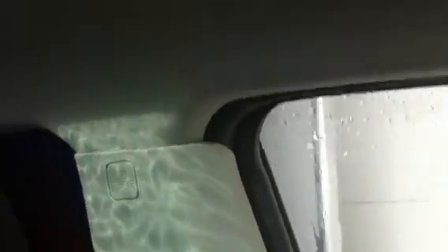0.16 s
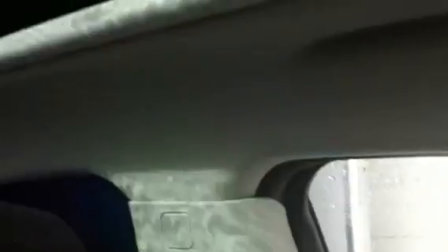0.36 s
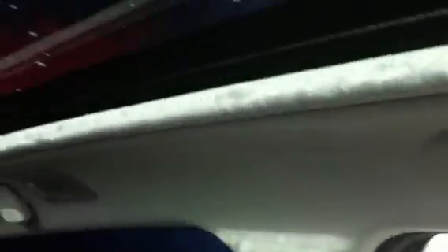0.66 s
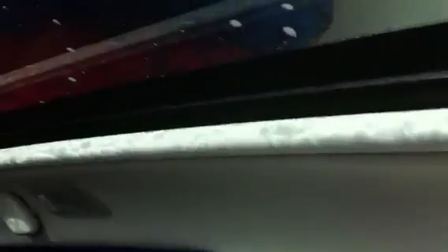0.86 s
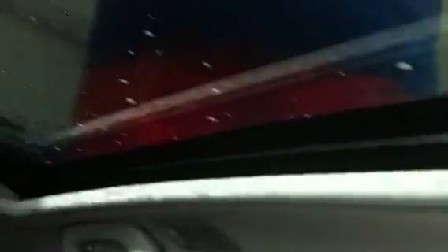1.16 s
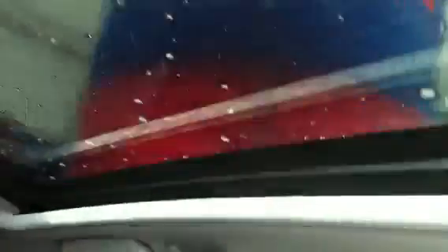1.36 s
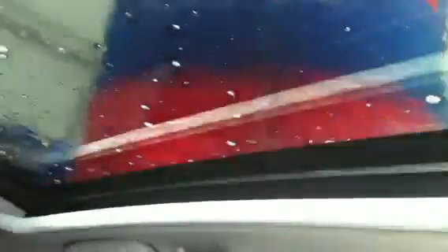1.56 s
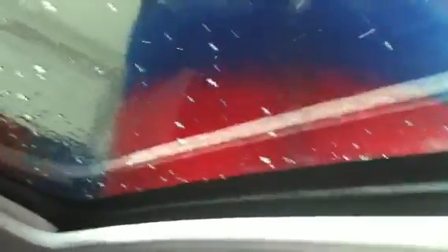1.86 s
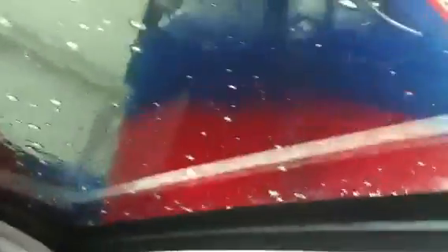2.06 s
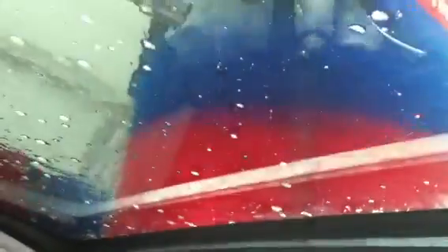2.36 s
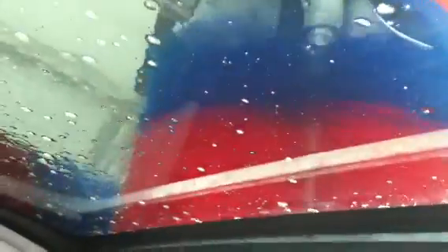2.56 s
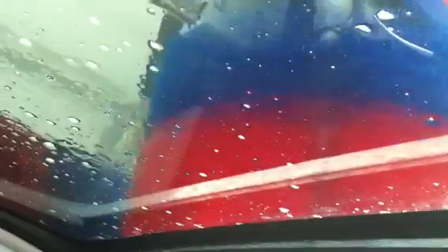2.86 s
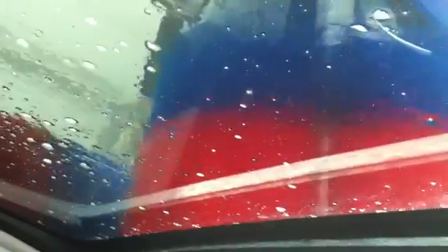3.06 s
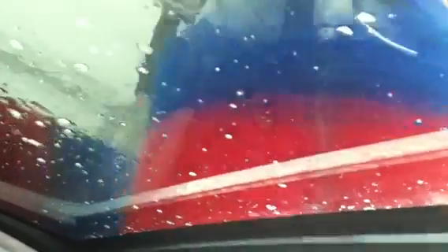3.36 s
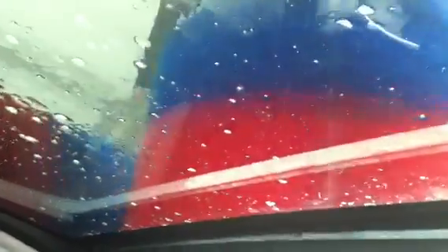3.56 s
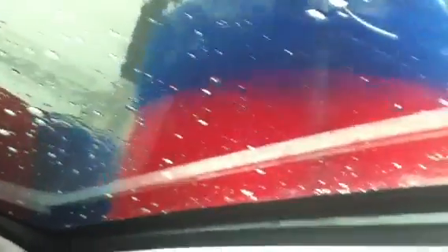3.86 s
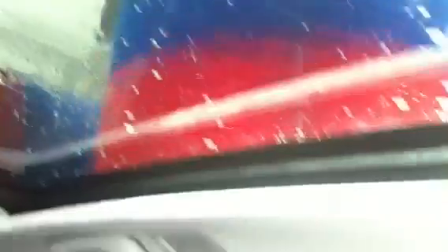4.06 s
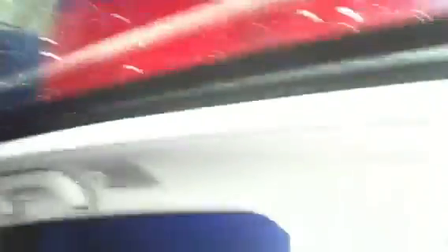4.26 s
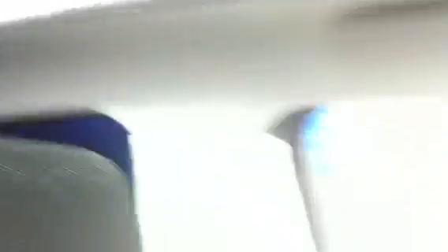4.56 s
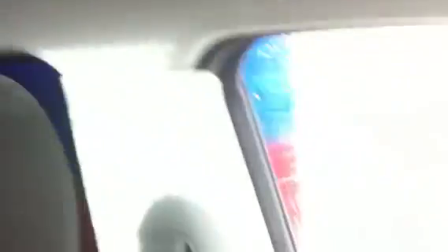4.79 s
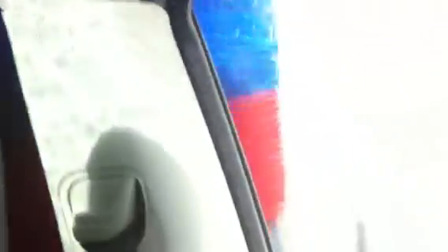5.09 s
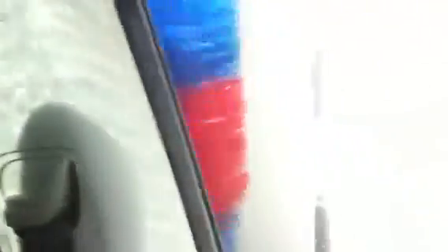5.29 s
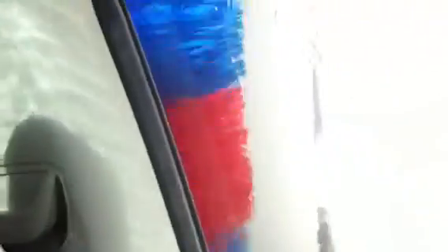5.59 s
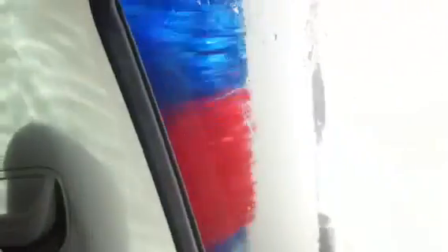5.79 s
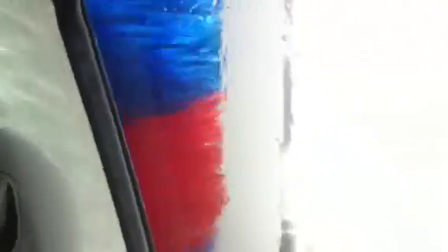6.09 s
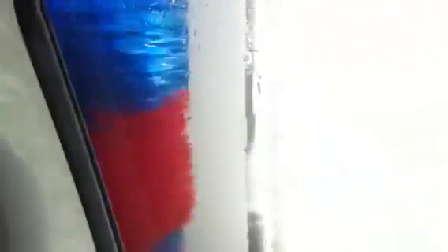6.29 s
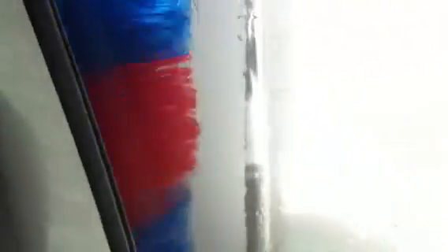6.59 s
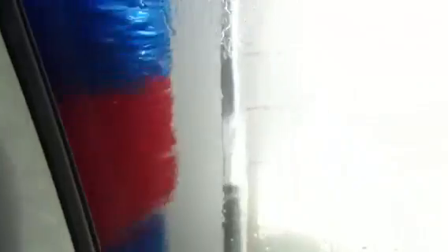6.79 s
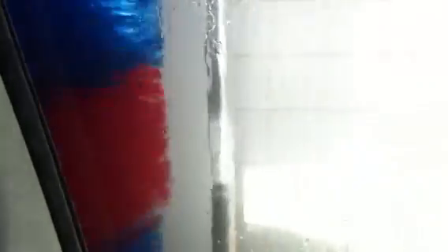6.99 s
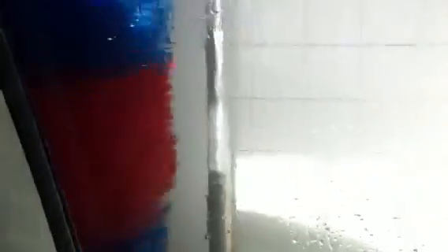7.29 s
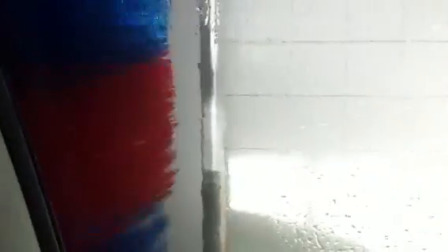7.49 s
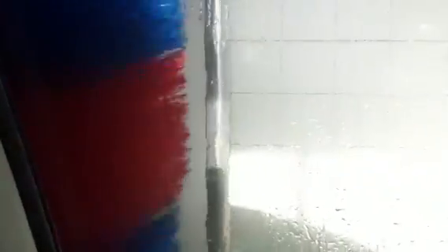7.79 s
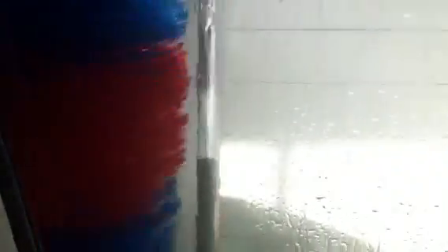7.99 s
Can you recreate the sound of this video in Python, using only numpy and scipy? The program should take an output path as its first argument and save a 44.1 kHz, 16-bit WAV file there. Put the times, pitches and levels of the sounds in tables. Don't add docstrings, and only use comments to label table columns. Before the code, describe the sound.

Close cabin sound: smooth water hiss, pattering on glass and low rumble. Scraping, stuttering skin noise covers the microphone, leaving a quiet muffled drone with a small tick. Then a hard thump, rub and popping release bring the wash back, crisp and misty. Brush strips slap the door skin and windows, pausing briefly, then drumming harder with bursts of splash before easing at the end.

```python
import sys
import numpy as np
from scipy import signal
from scipy.io import wavfile

SR = 44100
rng = np.random.default_rng(int(sys.argv[2]) if len(sys.argv) > 2 else 0)


def wav_out(sig):
    wavfile.write(sys.argv[1], SR, np.round(np.clip(np.atleast_2d(sig).T, -1, 1) * 32767).astype(np.int16))


def field_ratio(decibels):
    return 10 ** (np.asarray(decibels, dtype=float) / 20)


N = 358974
TURN_S = 3
MEAN_FLOW_DB = -41


def rms_one(x):
    return x / np.sqrt(np.mean(x ** 2) + 1e-20)


def in_time(rows):
    s, *columns = np.transpose(rows)
    return [np.interp(np.arange(N) / SR, s, c) for c in columns]


def fading(t, start_s, decay_s):
    return np.exp(-np.maximum(t - start_s, 0) / decay_s)


def drift(rate):
    r = np.exp(-80 * np.pi * rate / SR)
    slow = signal.lfilter([1], [1, -2 * r, r * r], rng.standard_normal(N // 40 + 2002))[2000:]
    return np.interp(np.arange(N) / 40, np.arange(len(slow)), rms_one(slow))


def butter(x, hz, kind, order=2):
    return signal.sosfilt(signal.butter(order, hz, kind, fs=SR, output="sos"), x)


def resonate(x, hz, width_hz):
    r = np.exp(-np.pi * width_hz / SR)
    zeros = np.array([1, 0, -1]) * (1 - r * r) / 2
    poles = [1, -2 * r * np.cos(2 * np.pi * hz / SR), r * r]
    return signal.lfilter(zeros, poles, x + 1e-18)


def grains(per_s, spread_db):
    sizes = field_ratio(spread_db * np.minimum(rng.exponential(1, N), 4)) * rng.choice([-1, 1], N)
    return sizes * (rng.random(N) < per_s / SR)


def coloured(spectrum, patchy_db, shared_db):
    hz, db = np.transpose(spectrum)
    edges = 2 ** np.arange(np.log2(hz[0]), np.log2(hz[-1]) + 1 / 6, 1 / 3)
    together = shared_db * drift(7.1)
    white = rng.standard_normal((2, N))
    out = 0
    for k, (low, high) in enumerate(zip(edges, np.minimum(edges[1:], .45 * SR))):
        level_db = np.interp(np.log(low * high) / 2, np.log(hz), db)
        flicker = field_ratio(level_db + together + patchy_db * drift(18.0))
        out = out + flicker * butter(white[k % 2], [low, high], "band")
    return rms_one(out)


# pitch_hz, width_hz, level_db
DOOR_MODES = [(235.8, 38.6, -3.5), (283.1, 37.6, -2.5), (351.2, 31, -8)]


def door_skin(blows):
    out = 0
    for k, (hz, width_hz, db) in enumerate(DOOR_MODES):
        once = resonate(blows, hz, width_hz)
        out = out + field_ratio(db) * resonate(once, hz, 2.0 * width_hz) * (-1) ** k
    return out


# time_s, drumming_db
BRUSH_LOAD = [(0, -40), (.3, -38), (.72, -29), (4.42, -38.5), (5.0, -33.5), (5.5, -26), (5.8, -24.5),
              (5.95, -30.5), (6.4, -39.5), (6.7, -23), (6.96, -26), (7.25, -19.5), (7.42, -25.5),
              (7.62, -17.5), (7.85, -22), (8.14, -31.5)]
# time_s, hiss_db
WATER_FLOW = [(0, -42.5), (.46, -41), (.524, -37.5), (.57, -43), (.7, -38), (4.42, -43.5), (4.84, -38.5),
              (5.0, -40), (5.6, -37.5), (5.82, -39), (5.96, -44), (6.5, -44.5), (6.7, -42), (6.99, -43.5),
              (7.16, -35.5), (7.36, -40), (7.66, -35), (8.14, -41.5)]
# start_s, peak_db
STRIP_THUDS = [(5.038, -20), (5.32, -23), (5.563, -16), (5.619, -19.5), (5.719, -16), (5.753, -12.5),
               (5.842, -19.5), (5.899, -16), (6.486, -31), (6.65, -14), (6.689, -18), (6.721, -20),
               (6.82, -17), (7.069, -23), (7.117, -13), (7.206, -15), (7.25, -11), (7.304, -12.5),
               (7.457, -10.5), (7.549, -10), (7.598, -14), (7.636, -10), (7.699, -7.5), (7.787, -12),
               (7.817, -22), (7.848, -17.5), (7.906, -11.5), (8.006, -25), (8.063, -22)]
# pitch_hz, width_hz, level_db
GLASS_MODES = [(600, 63, -1.5), (894, 35, 0), (1034, 36, -0.5), (1962, 70, -8)]
# pitch_hz, level_db_per_hz
RUMBLE_SPECTRUM = [(30, -28.5), (50, -38), (68, -25.5), (124, 3.5), (190, 2.5), (300, -1.5), (450, -5.5),
                   (700, -57)]
# pitch_hz, level_db_per_hz
PATTER_SPECTRUM = [(250, -8.5), (420, -1), (540, -5), (900, -7.5), (1200, -11), (1600, -19), (2500, -23)]


def brushes():
    mean_load_db = -30
    rumble_mean_db, rumble_share = -38.5, 0.18
    patter_mean_db, patter_share = -38, .6
    surge_db, surges_per_s = 1.35, 5.4
    roof_rumble_db, roof_patter_db = 3, 2.5
    (load_db,), (flow_db,) = in_time(BRUSH_LOAD), in_time(WATER_FLOW)
    roof = np.arange(N) < TURN_S * SR
    rumble_db = rumble_mean_db + rumble_share * (load_db - mean_load_db) + roof_rumble_db * roof
    patter_db = patter_mean_db + patter_share * (flow_db - MEAN_FLOW_DB) + roof_patter_db * roof
    panel_db = load_db + surge_db * drift(surges_per_s)

    slaps = butter(grains(900.0 * field_ratio(4.0 * drift(22.0)), spread_db=3.0), 1740, "low")
    panel = rms_one(door_skin(slaps))
    glass = 0
    for k, (hz, width_hz, db) in enumerate(GLASS_MODES):
        glass = glass + field_ratio(db) * resonate(slaps, hz, width_hz) * (-1) ** k
    patter = coloured(PATTER_SPECTRUM, patchy_db=0.5, shared_db=1.1)
    patter = patter + field_ratio(panel_db + 21.0) * rms_one(glass)
    heavy = np.zeros(N)
    for s, db in STRIP_THUDS:
        heavy[round(s * SR)] = field_ratio(db + 40.5)
    rumble = coloured(RUMBLE_SPECTRUM, patchy_db=1.0, shared_db=0.77)
    return (field_ratio(rumble_db + 4.5) * rumble + door_skin(heavy)
            + field_ratio(panel_db - 4.5) * panel + field_ratio(patter_db - 1.3) * patter)


# pitch_hz, level_db_per_hz
HISS_SPECTRUM = [(900, -6), (1500, 1), (2200, 0), (3900, 0.5), (5200, -3.5), (7000, -11.5), (9000, -10.5)]
# pitch_hz, level_db_per_hz
MIST_SPECTRUM = [(4000, -11), (6000, 1), (9000, 0.5), (10500, -4), (14400, -6.5), (16000, -13)]


def spray():
    splash_db_at_full, splash_s = 2.5, 0.013
    mist_mean_db, mist_share, roof_mist_db = -48, 0.79, -3.5
    shadow_share, shadow_lead_s = 1.2, .025
    cloud_start_db, cloud_from_s, cloud_thins_s = 3, 3.9, .8
    t = np.arange(N) / SR
    splash_db = 0
    for s, db in STRIP_THUDS:
        splash_db = splash_db + splash_db_at_full * field_ratio(db + 11) * (t >= s) * fading(t, s, splash_s)
    hiss_db = in_time(WATER_FLOW)[0] + splash_db
    shadow_db = shadow_share * np.roll(opening_db(), -int(shadow_lead_s * SR))
    cloud_db = cloud_start_db * fading(t, cloud_from_s, cloud_thins_s)
    mist_db = mist_mean_db + mist_share * (hiss_db - MEAN_FLOW_DB)
    mist_db = mist_db + np.where(t < TURN_S, roof_mist_db + shadow_db, cloud_db)

    drops = rms_one(butter(grains(1500.0, spread_db=5.5), [2500, 11000], "band"))
    hiss = coloured(HISS_SPECTRUM, patchy_db=1.0, shared_db=0.76) + field_ratio(-13.5) * drops
    mist = coloured(MIST_SPECTRUM, patchy_db=0.7, shared_db=1.3)
    return field_ratio(hiss_db - 1.53) * hiss + field_ratio(mist_db - 0.93) * mist


# time_s, passed_db
FINGER_ON = [(.715, 0), (.735, -7.5), (.78, -31.5), (.9, -6.5), (.94, -47), (1.05, -55)]
# time_s, passed_db
FINGER_OFF = [(4.32, -53), (4.35, -27.5), (4.384, -6), (4.396, -1.5), (4.41, 0.5)]


def opening_db():
    return in_time(FINGER_ON + FINGER_OFF)[0]


def stroke_db(s, rise_s, hold_s, fall_s, db):
    t = np.arange(N) / SR
    away = np.maximum(np.maximum((s - t) / rise_s, (t - s - hold_s) / fall_s), 0)
    return db - 30 * np.minimum(away, 4) ** 1.19


# full_from_s, rise_s, hold_s, fall_s, pressure_db
DRAG_STROKES = [(0.738, 0.015, .085, .03, -26.5), (0.844, 0.027, 0.054, 0.044, -11.5),
                (.972, 0.033, .042, 0.023, -7.5), (1.1, 0.056, 0.038, 0.11, -29.5),
                (1.208, 0.059, .004, .025, -29.5), (1.259, 0.083, .04, 0.032, -23),
                (1.335, .03, .045, .012, -52.5), (1.391, .008, 0.06, 0.012, -8),
                (4.093, 0.044, .004, .012, -21), (4.1, .012, 0.045, 0.025, -11.5),
                (4.162, .02, .004, 0.11, -27.5), (4.295, 0.14, .006, 0.041, -32),
                (4.357, .045, .016, .006, -27)]
# full_from_s, rise_s, hold_s, fall_s, pressure_db
STILL_PRESSES = [
    (1.784, 0.019, 0.013, 0.037, -36.5),
    (1.56, .04, 0.0091, 0.046, -48),
]
# centre_s, half_length_s, strength_db
SEAL_SKIDS = [
    (0.867, .03, 0),
    (1.003, 0.022, 3),
    (1.427, .014, 7),
    (4.107, 0.025, 4),
]


def rubbing():
    grip_waver_db, press_dull_db = 1.44, -15
    port_hz, port_width_hz = 183.6, 120
    sliding_db = np.max([stroke_db(*row) for row in DRAG_STROKES], axis=0) + grip_waver_db * drift(30.0)
    press_db = np.max([stroke_db(*row) for row in STILL_PRESSES], axis=0)
    t = np.arange(N) / SR
    skid_db = sum(db * np.exp(-((t - s) / half_s) ** 2) for s, half_s, db in SEAL_SKIDS)
    pressure_db = np.maximum(sliding_db, press_db) - skid_db
    slip_db = np.maximum(sliding_db, press_db + press_dull_db) + .5 * skid_db
    creak_db = -7.5 + 1.36 * slip_db
    scratch_db = -31.5 + 0.7 * slip_db
    fizz_db = -49.5 + 1.3 * slip_db

    pump = resonate(butter(grains(1500.0, spread_db=2.5), 570, "low"), port_hz, port_width_hz)
    creak = butter(grains(4000.0, spread_db=1.5), [400, 1150], "band", order=2)
    steps = signal.lfilter([1], [1, -.93], grains(12000.0, spread_db=-1.5))
    scratch = butter(butter(steps, 1300, "high"), 2000, "low", order=1)
    fizz = butter(steps, 5000, "high")
    return (field_ratio(fizz_db) * rms_one(fizz) + field_ratio(pressure_db - 1.2) * rms_one(pump)
            + field_ratio(creak_db - 6.5) * rms_one(creak) + field_ratio(scratch_db - 5.5) * rms_one(scratch))


# start_s, jump_db, ring_hz, t60_s, extra_start_hz
SEAL_SNAPS = [
    (0.728, -16, 201, 0.015, 900),
    (2.0937, -21.5, 132, 0.068, 1340),
    (3.242, -47, 250, 0.019, 300),
    (4.0899, 2, 179, 0.054, 130),
    (4.3587, -23, 151, 0.059, 400),
    (4.3763, -16.5, 165, 0.067, 305),
    (4.3841, -26, 200, .01, 600),
    (4.3875, 0, 198, .02, 497),
    (4.3917, -3.5, 227, 0.01, 576),
]
# pitch_hz, width_hz, level_db
CASE_MODES = [(1060, 110, -14), (2420, 200, -6)]


def snaps():
    glide_s, onset_cycles = 0.00068, 0.062
    out, t = np.zeros(N), np.arange(SR // 10) / SR
    for s, db, hz, t60_s, extra_hz in SEAL_SNAPS:
        cycles = hz * t + extra_hz * glide_s * (1 - np.exp(-t / glide_s))
        onset = 1 - np.exp(-t * extra_hz / onset_cycles)
        ring = field_ratio(db - 60 * t / t60_s) * onset * np.cos(2 * np.pi * cycles)
        out[round(s * SR):][:len(t)] -= ring
    out = out + sum(field_ratio(db + 6.0) * resonate(out, hz, width_hz) for hz, width_hz, db in CASE_MODES)
    return butter(out, 2700, "low")


# pitch_hz, level_db_per_hz
LEAK_LOW_SPECTRUM = [(18, -75), (30, -38.5), (59, -33.5), (79, -11), (124, 3), (173, -3.5), (208, 1),
                     (335, -6.5), (480, -15), (620, -47.5), (1060, -120)]
# pitch_hz, level_db_per_hz
LEAK_UPPER_SPECTRUM = [(350, -15.5), (550, -1), (1000, -7.5), (1400, -17.5), (1900, -22.5), (3000, -23.5)]


def leak():
    gain = gain_db()
    low_db = -48.5 + 0.81 * gain
    upper_db = -68.5 + 0.96 * gain
    sealed = 1 - field_ratio(opening_db())
    low = coloured(LEAK_LOW_SPECTRUM, patchy_db=-0.2, shared_db=0.5)
    upper = coloured(LEAK_UPPER_SPECTRUM, patchy_db=1.1, shared_db=0.4)
    return sealed * (field_ratio(low_db + 4.0) * low + field_ratio(upper_db + 4.5) * upper)


# start_s, duck_db
GAIN_DUCKS = [
    (1.44, -10.5),
    (4.1, -7),
]


def gain_db():
    early_gain_db, recover_s = -4, 1.01
    t = np.arange(N) / SR
    ducked_db = sum(db * (t >= s) * fading(t, s, recover_s) for s, db in GAIN_DUCKS)
    return early_gain_db * (t < GAIN_DUCKS[0][0]) + ducked_db


def scene():
    cabin = field_ratio(opening_db()) * (brushes() + spray())
    finger = butter(rubbing(), 80, "high") + butter(snaps(), 53, "high")
    return (cabin + leak() + finger)[None]


def top_cut(x):
    return signal.sosfilt(signal.butter(12, 15850, fs=SR, output="sos"), x)


def record(dry):
    bass_cut_hz, self_noise_db, ceiling = 37, -72, .71
    white = rng.standard_normal(dry.shape)
    hiss = white + field_ratio(2) * resonate(white, 3800, 2500)
    x = butter(dry, bass_cut_hz, "high", order=1) + field_ratio(self_noise_db + gain_db()) * hiss
    x = x / (1 + (x / ceiling) ** 10) ** (1 / 10)
    return top_cut(x)


dry = scene()
out = record(dry)
wav_out(out)
```